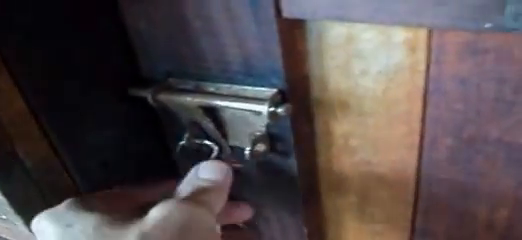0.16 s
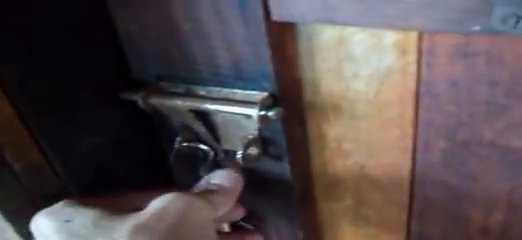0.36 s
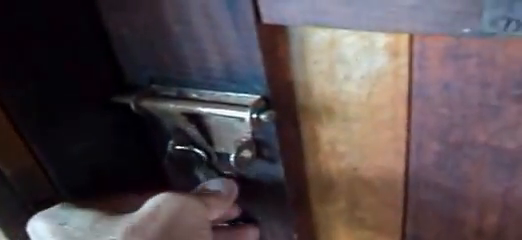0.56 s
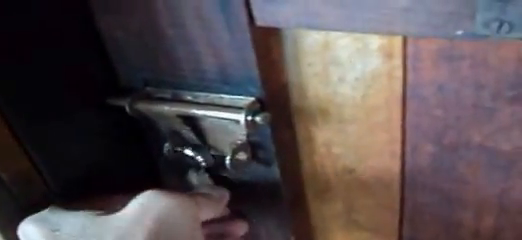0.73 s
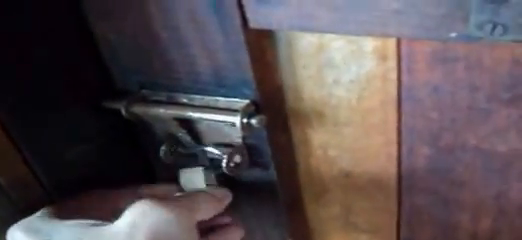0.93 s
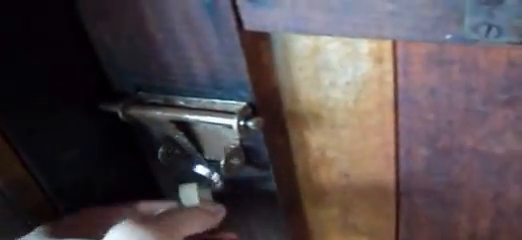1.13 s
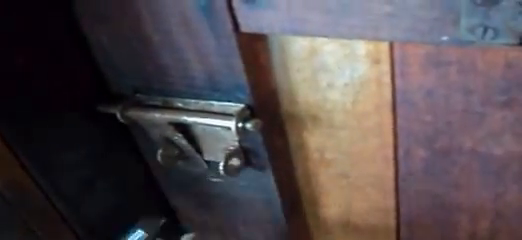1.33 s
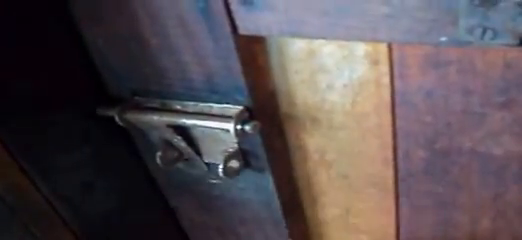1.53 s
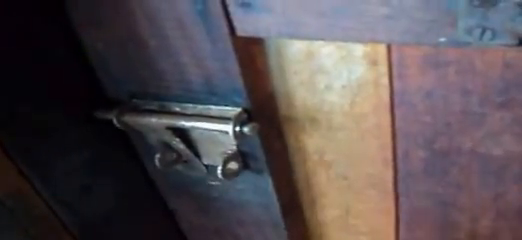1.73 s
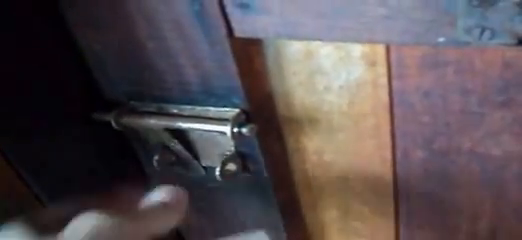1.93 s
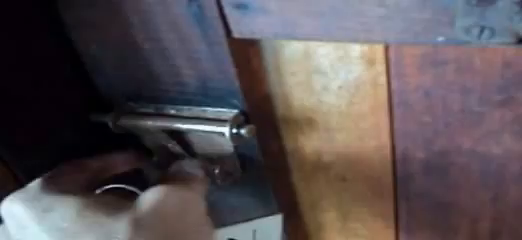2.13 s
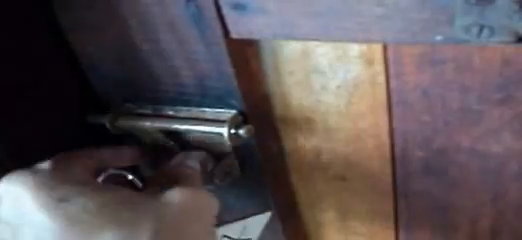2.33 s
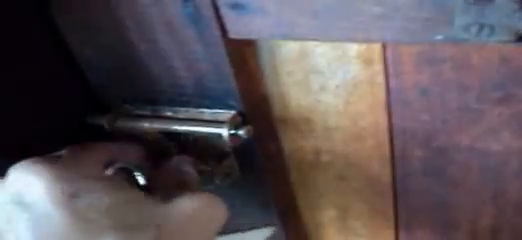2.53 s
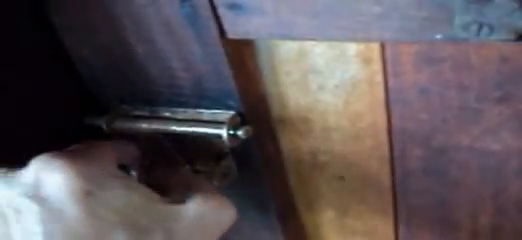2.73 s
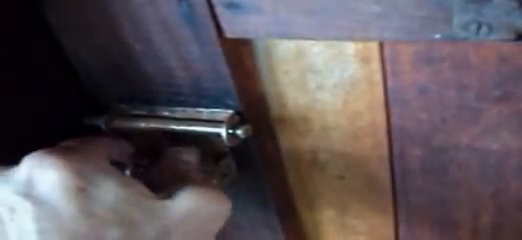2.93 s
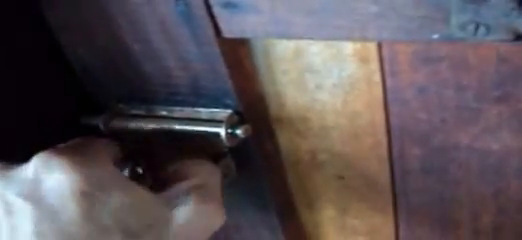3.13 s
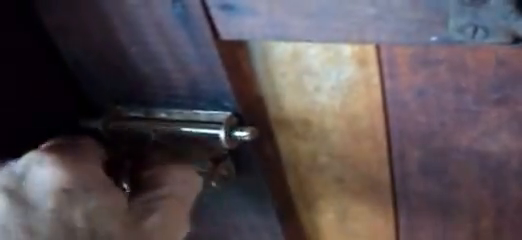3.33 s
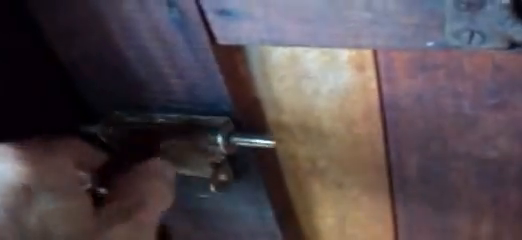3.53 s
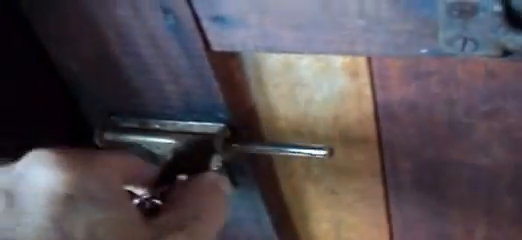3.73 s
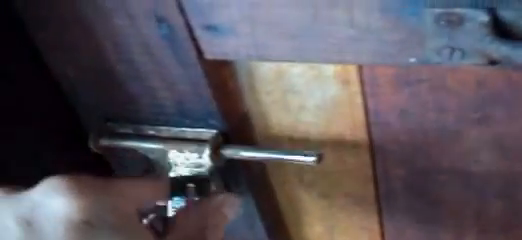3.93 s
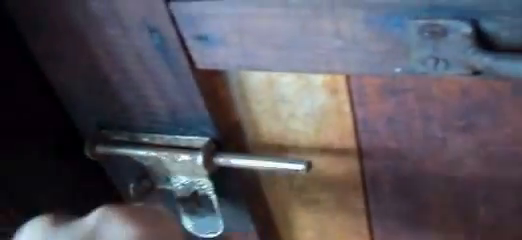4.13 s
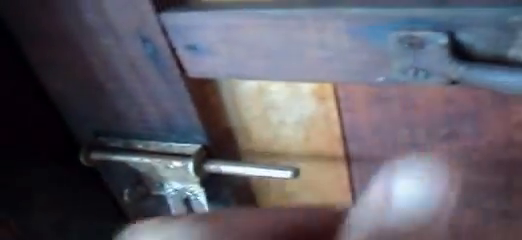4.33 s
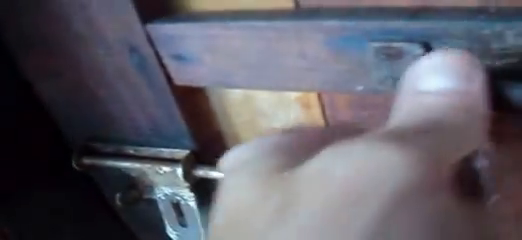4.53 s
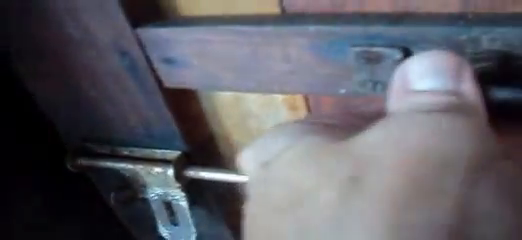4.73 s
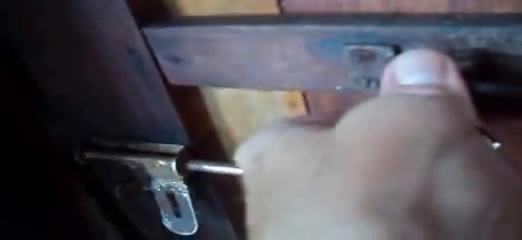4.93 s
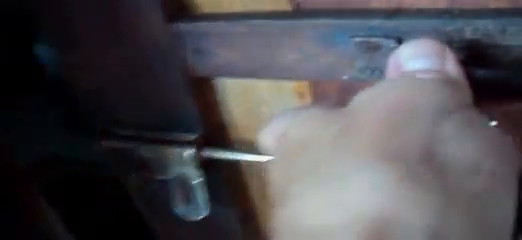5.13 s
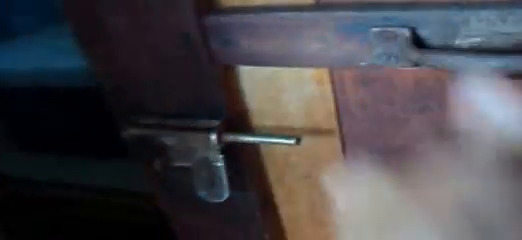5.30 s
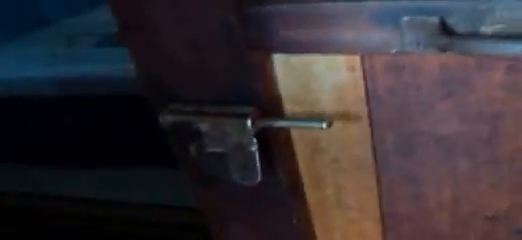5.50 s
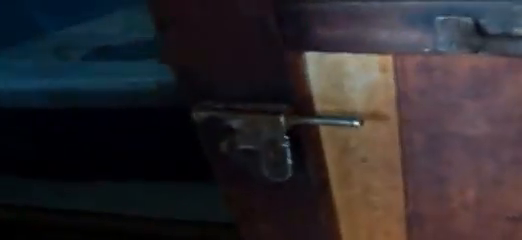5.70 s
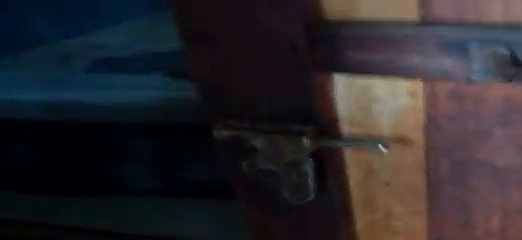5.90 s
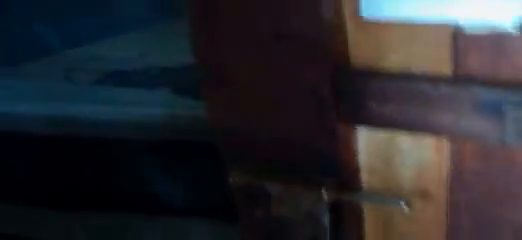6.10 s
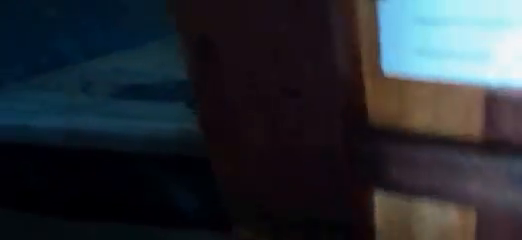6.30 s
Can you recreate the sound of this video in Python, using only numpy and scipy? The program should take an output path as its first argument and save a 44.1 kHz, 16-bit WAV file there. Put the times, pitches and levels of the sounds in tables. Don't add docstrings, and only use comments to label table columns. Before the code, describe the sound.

A hand unfastens a metal bolt on a wooden door in a small, fairly dry room. Light ticks and taps lead to bright clacks, then a lull with soft touches, a gripping rattle, a tiny rising squeak, a short rough slide and a solid stop. One more hard clack follows, then wooden bumps from pushing. It fades into low street rumble, hum and hiss, miked closely.

```python
import sys
import numpy as np
from scipy import signal
from scipy.fft import rfft, irfft, next_fast_len
from scipy.io import wavfile
from scipy.ndimage import uniform_filter1d

SR = 44100
rng = np.random.default_rng(int(sys.argv[2]) if len(sys.argv) > 2 else 0)


def int16_out(signal):
    q = np.round(np.clip(np.atleast_2d(signal).T, -1, 1) * 32767)
    wavfile.write(sys.argv[1], SR, q.astype(np.int16))


def invert_db(x):
    u = np.asarray(x, float) / 20
    return 10 ** u


N = 280507


def rms_one(x):
    return x / np.sqrt(np.mean(x ** 2) + 1e-20)


def in_time(rows, outside=None):
    s, *columns = np.transpose(rows)
    return [np.interp(np.arange(N) / SR, s, c, outside, outside) for c in columns]


def ring(clicks, hz, t60_s):
    r = invert_db(-60 / (t60_s * SR))
    w = 2 * np.pi * hz / SR
    return signal.lfilter([0, np.sin(w)], [1, -2 * r * np.cos(w), r * r], clicks + 1e-18)


def drift(rate_hz):
    r = np.exp(-2 * np.pi * rate_hz / SR)
    settled = signal.lfilter([1], [1, -2 * r, r * r], rng.standard_normal(N + SR))[SR:]
    return rms_one(settled)


def coloured(spectrum):
    hz, db = np.transpose(spectrum)
    size = next_fast_len(N)
    grid_hz = np.maximum(np.arange(size // 2 + 1) * SR / size, 1)
    gain = invert_db(np.interp(np.log(grid_hz), np.log(hz), db))
    return rms_one(irfft(rfft(rng.standard_normal(size)) * gain, size)[:N])


def swell(peak_s, rise_s, fall_s):
    corners_s = [peak_s - rise_s, peak_s, peak_s + fall_s]
    return invert_db(np.interp(np.arange(N) / SR, corners_s, [-18, 0, -18], -200, -200))


def soft(x, top_hz):
    return signal.sosfilt(signal.butter(4, top_hz, fs=SR, output="sos"), x)


def contact(x, touch_s, low_hz):
    force = np.hanning(round(touch_s * SR) + 2)
    pushed = np.convolve(x, force / force.sum())[:N]
    return signal.sosfilt(signal.butter(2, low_hz, "high", fs=SR, output="sos"), pushed)


def struck(times_s, modes, level_db, pitch_hz, focus_db, chatter_s, rebound_db):
    grip_s, free_t60_s, gripped_cycles = 4.5, 0.1, 26
    uneven_db = 2.5
    late = np.pad(rng.random((len(times_s), 4)), ((0, 0), (1, 0)))
    late[:, 1] = -0.18
    at = ((times_s[:, None] + late * chatter_s) * SR).astype(int)
    scatter = rng.standard_normal((len(times_s), len(modes), 5))
    grip = int(grip_s * SR)
    out = np.zeros(N)
    for k, (hz, db, t60_s) in enumerate(modes):
        away_db = focus_db * np.abs(np.log2(hz / pitch_hz))
        strength_db = (level_db + db - away_db)[:, None] + (late != 0) * rebound_db
        strength_db = strength_db - 6 * np.abs(late) + uneven_db * scatter[:, k]
        clicks = np.zeros(N)
        np.add.at(clicks, at, invert_db(strength_db))
        out[:grip] += ring(clicks[:grip], hz, min(t60_s, free_t60_s))
        out[grip:] += ring(clicks[grip:], hz, min(t60_s, gripped_cycles / hz))
    return out


# f/Hz, level/dB per Hz
STREET = [(40, -3.5), (120, 1), (300, -0.5), (650, -5.5), (950, -2.5), (1300, -8), (1800, -17.5),
          (3000, -20.5), (5000, -38)]
# f/Hz, width/Hz, level/dB
HUM = [(95, 7.1, -26), (118.9, 2.3, 1.5), (145.9, 8.5, 4), (200, 10.4, 0)]
# t/s, level/dB
HUM_LOAD = [(0.0, -56), (0.69, -51.5), (0.94, -52), (1.2, -50.5), (2.2, -53), (3.24, -50.5), (3.7, -49.5),
            (4.39, -53.5), (4.8, -61), (5.0, -48), (5.4, -60), (6.36, -65.5)]
# f/Hz, level/dB per Hz
HISS = [(20, -16.5), (1500, 3.5), (3700, 2), (9500, -5.5), (14000, -3.5)]


def background():
    street_db, street_fade_db_per_s, hiss_db = -51.5, 0.0167, -66.5
    wake_start_db, wake_s, hiss_follows = -10.5, 0.4, 0.3
    t = np.arange(N) / SR
    wake_db = wake_start_db * np.exp(-(t / wake_s) ** 2)
    street_db = street_db + street_fade_db_per_s * t + wake_db + 1.0 * drift(4.7)
    street = invert_db(street_db) * coloured(STREET)
    white = rng.standard_normal(N)
    hum = sum(invert_db(db) * rms_one(ring(white, hz, 3.7 / width_hz)) for hz, width_hz, db in HUM)
    hum = invert_db(in_time(HUM_LOAD)[0] + wake_db - 1.0) * rms_one(hum)
    hiss = invert_db(hiss_db + hiss_follows * wake_db + 5) * coloured(HISS)
    return street + hum + hiss


def room(x):
    t60_s, wall_cut_hz = 0.33, 6100
    size = next_fast_len(N + SR)
    w = 2 * np.pi * np.arange(size // 2 + 1) / size
    dull = 1 / (1 + 1j * w * SR / (2 * np.pi * wall_cut_hz))
    echoes = 0
    for k, lag_s in enumerate(rng.uniform(0.006, 0.026, 8)):
        loop = invert_db(-60 * lag_s / t60_s) * dull * np.exp(-1j * w * lag_s * SR)
        echoes = echoes + (-1) ** k * loop / (1 - loop)
    return irfft(rfft(x, size) * echoes, size)[:N]


def bump():
    bump_s, bump_db, fall_s = 0.098, -38, 0.0042
    since_s = np.arange(N) / SR - bump_s
    return invert_db(bump_db) * (since_s > 0) * np.exp(-np.maximum(since_s, 0) / fall_s)


# peak t/s, rise/s, fall/s, level/dB
SWAY = [
    (3.22, 0.1, 0.19, -43.5),
    (3.85, 0.13, 0.056, -48),
    (4.62, 0.066, 0.058, -52),
    (4.95, 0.076, 0.055, -50),
    (5.11, 0.1, 0.15, -41.5),
    (5.42, 0.079, .05, -61),
]


def sway():
    push = sum(invert_db(db) * swell(s, rise_s, fall_s) for s, rise_s, fall_s, db in SWAY)
    leaf = coloured([(15, -28), (40, -3), (80, -6.5), (105, 6), (140, -14.0), (300, -49)])
    return uniform_filter1d(push, size=200) * leaf


# f/Hz, level/dB, t60/s
LOOSE = [(2300, 1, 0.0032), (2610, 1, 0.023), (2990, -2.5, 0.018), (3360, -2, 0.018), (3720, -0.5, 0.021),
         (4500, 0.5, 0.0055), (4820, 7, 0.0073), (5450, -16, 0.0033), (5880, -0.5, 0.012),
         (7220, -21.5, 0.021), (7230, -8.5, 0.011), (8800, -13, 0.0095), (12100, -18, .005),
         (14000, -22, .005)]
# t/s, peak level/dB, f/Hz
TICKS = [(0.1995, -45, 3150), (0.7352, -49, 2900), (0.7747, -41, 3150), (0.7943, -33, 1980),
         (0.8394, -43, 1920), (1.11, -41.5, 2430), (1.135, -45, 3360), (1.1746, -44.5, 3410),
         (1.2084, -44, 3460), (1.5998, -47, 2270), (1.842, -34.5, 2240), (3.195, -29.5, 2430),
         (3.23, -40, 2950), (3.4605, -62, 2550), (3.67, -54, 2920), (3.6894, -47, 1990),
         (3.7366, -23, 2600), (3.7481, -23, 2570), (4.143, -25, 3040), (4.1488, -21, 2370),
         (4.9427, -32, 2190), (4.9888, -41, 3250)]


def ticks():
    own_ring_db, own_t60_s = -7, 0.033
    s, db, hz = np.transpose(TICKS)
    modes = [(2000, -8, 0.043)] + LOOSE
    touches = struck(s, modes, db - 12.5, hz, focus_db=19.5, chatter_s=0.008, rebound_db=-3.5)
    since_s = np.arange(2000) / SR
    for at, own_db, own_hz in zip((s * SR).astype(int), db, hz):
        decay = invert_db(own_db + own_ring_db - 60 * since_s / own_t60_s)
        touches[at:at + 2000] += decay * np.sin(2 * np.pi * own_hz * since_s)
    return contact(touches, 0.00005, 2400)


# t/s, slip f/Hz, level/dB, overtone level/dB re tone
SQUEAK = [
    (3.4, 1400, -48, -14),
    (3.4045, 1480, -35, -3),
    (3.4095, 1510, -24, -1),
    (3.4125, 1640, -23, -12),
    (3.417, 1720, -40, -25),
]


def squeak():
    slips_hz, tone_db, overtone_db = in_time(SQUEAK, outside=-200)
    phase = 2 * np.pi * np.cumsum(slips_hz) / SR
    t = np.arange(N) / SR
    rod_modes = [(4620, -25), (8050, -17.5), (9400, -26.0), (12500, -31), (14050, -22)]   # f/Hz, level/dB
    rod = sum(invert_db(db) * np.sin(2 * np.pi * hz * t) for hz, db in rod_modes)
    octave = invert_db(-1.5) * np.sin(2 * phase)
    return invert_db(tone_db) * (np.sin(phase) + invert_db(overtone_db) * (octave + rod))


def sing():
    sing_s, rise_s, length_s = 3.418, 0.006, 0.06
    sing_hz, width_hz, sing_db = 1990, 35, -39
    tone = rms_one(ring(rng.standard_normal(N), sing_hz, 1.8 / width_hz))
    return invert_db(sing_db) * swell(sing_s, rise_s, length_s) * tone


# f/Hz, level/dB, t60/s
STOP_RING = [(2724, -49, .1), (2930, -52, .1), (5512, -29, .012), (5512, -54, .2)]


def rod_stop():
    stop_s = 3.7845
    click = (np.arange(N) == round(stop_s * SR)) * 1.0
    return sum(invert_db(db) * ring(click, hz, t60_s) for hz, db, t60_s in STOP_RING)


# t/s, effort/dB
SLIDE = [
    (3.585, -53),
    (3.6, -55),
    (3.625, -38.5),
    (3.647, -33),
    (3.695, -25),
    (3.723, -29),
    (3.749, -25.5),
    (3.765, -31.5),
    (3.784, -34.5),
]
SLIDE_MIX_DB = (-3, -1.5, -5, -14)
# peak t/s, half length/s, plate level/dB, panel/dB re plate, steel/dB re plate
RUBS = [(0.73, 0.042, -45.5, -10, -21), (0.783, 0.054, -40.5, -11, -17), (0.845, 0.1, -52.5, 0, -20),
        (2.473, 0.03, -52, 7.5, -22), (2.909, 0.034, -41.5, -10, -26), (3.255, 0.038, -46, -6, -10),
        (3.375, 0.15, -47.5, -5, -15), (3.484, 0.017, -45, -1, -34), (3.52, 0.012, -40, -14, -24),
        (4.025, 0.061, -48.5, 2.5, -16), (4.074, 0.032, -49, 7, -5), (4.817, 0.057, -49, -0.5, -11),
        (4.949, 0.095, -47, 6, -7.5), (5.01, 0.03, -38.5, -2, -15), (5.063, 0.047, -46, 0.6, -9.5),
        (5.312, 0.2, -52, 1, -19), (5.873, 0.032, -49, -22, -21)]
# t/s, length/s, plate level/dB, panel/dB re plate, steel/dB re plate
RATTLES = [
    (0.947, 0.046, -32, -0.5, -10),
    (1.019, 0.047, -37.5, 4.5, -3.5),
    (1.114, 0.068, -45.5, 1.5, -11),
    (3.197, 0.054, -34.5, -11, -10),
    (3.415, 0.072, -39, 7, -2.5),
    (4.15, 0.05, -30.5, -17, -17),
    (4.867, 0.017, -43, -25, -8),
    (5.088, 0.065, -40.5, 10, -8),
]
# peak t/s, half length/s, level/dB
SCUFFS = [
    (0.756, 0.026, -57),
    (0.8, 0.049, -59.5),
    (1.118, 0.014, -51.5),
    (1.14, 0.012, -66),
    (1.178, 0.016, -60),
    (1.2, 0.0095, -61),
    (4.989, 0.005, -46.5),
]


def pressures():
    rattle_rise_s, rod_re_hasp_db, catch_db = 0.006, -9.5, 1.5
    gains = invert_db(in_time(SLIDE, outside=-200)[0] + np.array(SLIDE_MIX_DB)[:, None])
    shapes = [(s, half_s, half_s, *mix) for s, half_s, *mix in RUBS]
    shapes += [(s, rattle_rise_s, *rest) for s, *rest in RATTLES]
    for s, rise_s, fall_s, db, panel_db, steel_db in shapes:
        mix_db = np.array([[0], [panel_db], [steel_db], [steel_db + rod_re_hasp_db]])
        gains = gains + swell(s, rise_s, fall_s) * invert_db(db + mix_db)
    gains[-1] += sum(invert_db(db) * swell(s, half_s, half_s) for s, half_s, db in SCUFFS)
    waver = np.array([drift(16.7) for body in gains])
    return uniform_filter1d(gains, size=200, axis=1) * invert_db(catch_db * waver)


def rubbed(modes, grit, damping):
    rings = 0
    for k, (hz, db, t60_s) in enumerate(modes):
        rings = rings + invert_db(db) * (-1) ** k * ring(grit[k % 2], hz, t60_s * damping)
    return rms_one(rings)


# f/Hz, level/dB, t60/s
PANEL = [(84.5, -22, 0.12), (126, -23, 0.086), (192, 3, 0.11), (254, 5, 0.072), (300, -30.5, 0.029),
         (316.7, 6.5, 0.085), (362, -2, 0.14), (440, 7, 0.11), (481, 9.5, 0.047), (589, 10, 0.045)]
PLATE = [(669.5, -9.5, 0.082), (777, -21, 0.27), (873, 0, 0.13), (946, -3, 0.049), (928.6, 3, 0.15),
         (1011, -6, 0.15), (1138, 0, 0.05)]
HASP = [(1275, 9, 0.019), (1394, 0.5, 0.026), (1619, 1, 0.027), (1784, 0, 0.072), (1990, -8.5, 0.028)]
ROD = [(2610, -23, 0.022), (2800, 12, 0.026), (3110, -2.5, 0.042), (3430, 4, 0.018), (3870, -14.5, 0.014),
       (5200, -0.5, 0.0081), (5630, -11.5, .015), (5700, -10, 0.014), (7660, -13, 0.02), (8340, -8, 0.026),
       (9650, -13, 0.024), (10400, -38, 0.025), (12500, -14, 0.015), (13600, -22, .01)]


def strokes():
    catches_hz = 4500 * invert_db(3.0 * drift(120))
    caught = rng.random((2, N)) < catches_hz / SR
    force = invert_db(2.9 * np.minimum(rng.exponential(1, (2, N)), 4))
    grit = caught * force * rng.choice([-1, 1], (2, N))
    plate, panel, hasp, rod = pressures()
    blunt = plate * rubbed(PLATE, grit, 0.82)
    blunt += panel * rubbed(PANEL[2:], grit, 0.37)
    blunt += hasp * rubbed(HASP, grit, 0.96)
    rub = soft(blunt, top_hz=2040) + rod * rubbed(ROD[:5], grit, 0.7)
    brighter = (rod / invert_db(-49)) ** 0.16 * invert_db(-9.5)
    rub += rod * brighter * rubbed(ROD[5:], grit, 0.83)
    return signal.sosfilt(signal.butter(4, 250, "high", fs=SR, output="sos"), rub)


# t/s, plate peak level/dB, panel, hasp, crack/dB re plate
CLACKS = [(0.769, -33.5, -11, -5.5, -21), (0.941, -16.5, -15.5, -8.5, -8), (1.001, -17, -10, -2, -6),
          (1.016, -23.5, -12, -8, -4), (1.116, -34.5, -4, -16, -18), (2.634, -31, -6.5, -4, -17),
          (3.167, -28.5, -5, -17, -14), (3.193, -25, -9.5, -17, -7), (3.409, -28.5, -1.5, -8, -10),
          (3.46, -25, -29, -34, -14), (3.595, -32.5, -11, -24, -12), (3.784, -18, 5, -10, -2),
          (3.787, -16.5, -2.5, -8, -19), (4.143, -16.5, -11, -12.5, -14.5), (4.215, -27.5, -9, -11, -26),
          (4.863, -34.5, -11, -5.5, -8.5), (4.943, -28.5, -9, -7, -12), (5.093, -20.5, -2, -12.5, -13.5)]
# t/s, plate peak level/dB, hasp/dB re plate
TAPS = [(0.302, -39.5, -25), (0.46, -43.5, -12), (0.496, -34, -29), (2.486, -38, -6.5), (2.645, -27, -30),
        (2.752, -37.5, -9), (2.841, -29, -21), (2.883, -38, -5.5), (2.909, -31.5, -30), (3.481, -59, -21),
        (3.517, -35, -28), (5.7, -43, -14), (4.153, -25, -24)]
# t/s, panel peak level/dB, plate/dB re panel, panel f/Hz
THUDS = [
    (3.804, -30, -27, 320),
    (4.78, -26.5, -12, 239),
    (4.89, -30.5, -9, 254),
    (4.955, -32, 0, 293),
    (5.077, -22, -4, 231),
    (5.748, -38, -7, 440),
    (6.14, -49, 4, 188),
    (3.7836, -21, -14, 245),
    (5.113, -30.5, -16, 200),
]


def blows():
    clacks = [(*row, 320) for row in CLACKS]
    taps = [(s, db, -6, hasp_db, -24, 150) for s, db, hasp_db in TAPS]
    thuds = [(s, db + plate_db, -plate_db, -39, -26, hz) for s, db, plate_db, hz in THUDS]
    return clacks + taps + thuds


def knocks():
    s, plate_db, panel_db, hasp_db, crack_db, panel_hz = np.transpose(blows())
    plate = struck(s + 0.00085, PLATE, plate_db - 9.5, 930, focus_db=4, chatter_s=0.00881, rebound_db=-7.5)
    panel = struck(s, PANEL, plate_db + panel_db - 6.5, panel_hz,
                   focus_db=23.0, chatter_s=0.0057, rebound_db=-10.5)
    hasp = struck(s + 0.00057, HASP, plate_db + hasp_db - 13.5, 2310,
                  focus_db=-14, chatter_s=0.012, rebound_db=-7.0)
    crack = struck(s, LOOSE, plate_db + crack_db - 15.5, 4000, focus_db=-3.0, chatter_s=0.004, rebound_db=-6)
    body = contact(plate, 0.00069, 616) + contact(panel, 0.0013, 155) + contact(hasp, 0.0006, 1100)
    return soft(body, top_hz=2560) + contact(crack, 0.00005, 2300)


def scene():
    room_db = -24.5
    door = knocks() + ticks() + rod_stop() + strokes() + squeak() + sing()
    door = signal.sosfilt(signal.butter(4, 110, "high", fs=SR, output="sos"), door)
    return (door + invert_db(room_db) * room(door) + sway() + background() + bump())[None]


# low f/Hz, high f/Hz, opening level/dB
TOP_BANDS = [(10355, 10800, -40.5), (11300, 12200, -29.5), (11600, 12760, -45.5), (12500, 18800, -27),
             (13100, 14400, -20)]


def gated_treble(x):
    frame, frame_start = 1024, 187
    size = next_fast_len(N)
    spectrum = rfft(x, size)
    hz = np.arange(size // 2 + 1) * SR / size
    mids = irfft(spectrum * (hz > 600) * (hz < 4000), size)[:N]
    power = uniform_filter1d(mids ** 2, size=frame)[frame_start::frame]
    out = irfft(spectrum * (hz < TOP_BANDS[0][0]), size)[:N]
    for low_hz, high_hz, open_db in TOP_BANDS:
        is_open = np.repeat(power > invert_db(2 * open_db), frame) * 1.0
        is_open = np.pad(is_open, (0, frame))[frame // 2 - frame_start:][:N]
        band = irfft(spectrum * (hz >= low_hz) * (hz < high_hz), size)[:N]
        out += uniform_filter1d(is_open, size=256) * band
    return out


def roll_off(x):
    return signal.sosfilt(signal.butter(12, 14540, fs=SR, output="sos"), x)


def record(dry):
    offset = -0.0004
    mix = gated_treble(dry[0])[None] + offset
    return roll_off(mix)


dry = scene()
out = record(dry)
int16_out(out)
```